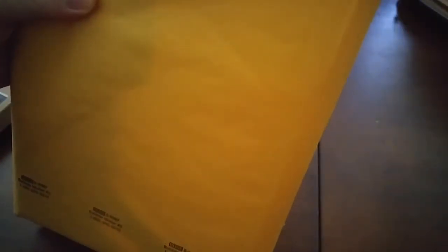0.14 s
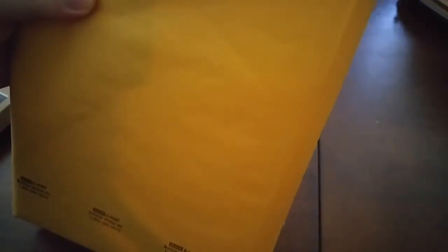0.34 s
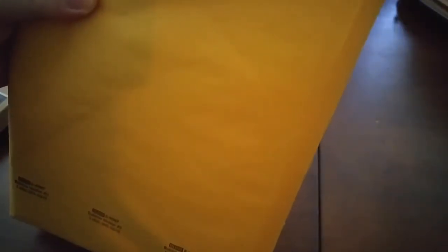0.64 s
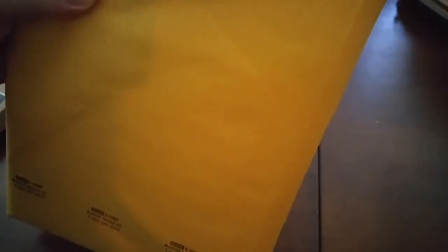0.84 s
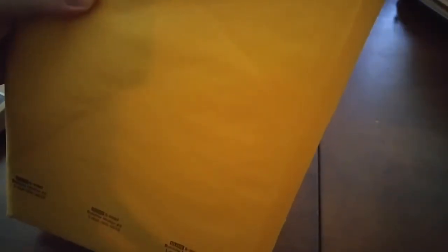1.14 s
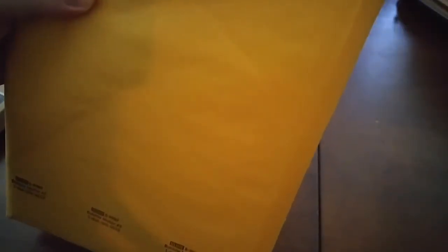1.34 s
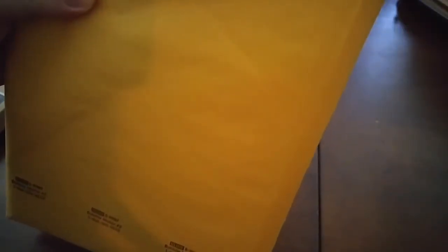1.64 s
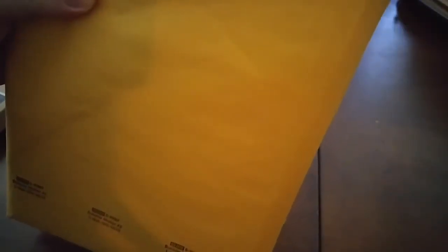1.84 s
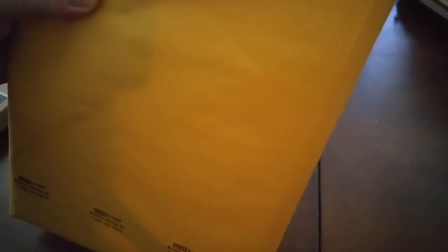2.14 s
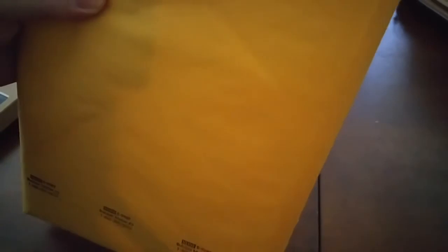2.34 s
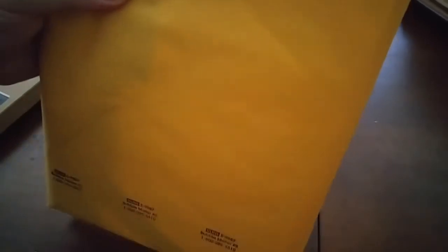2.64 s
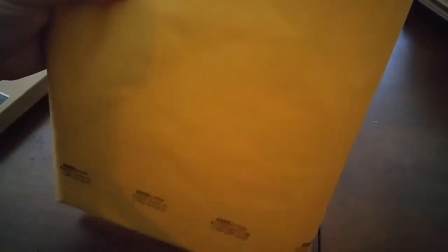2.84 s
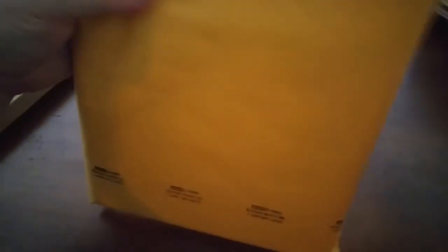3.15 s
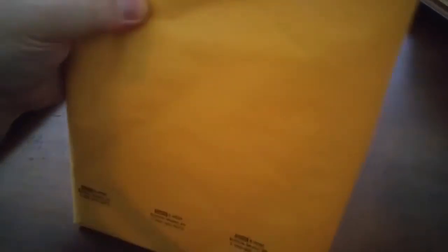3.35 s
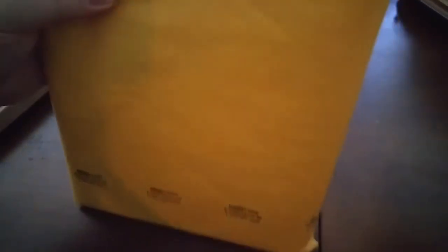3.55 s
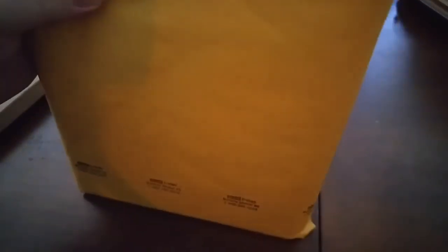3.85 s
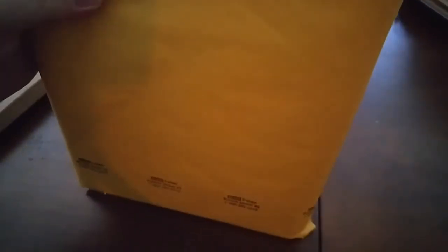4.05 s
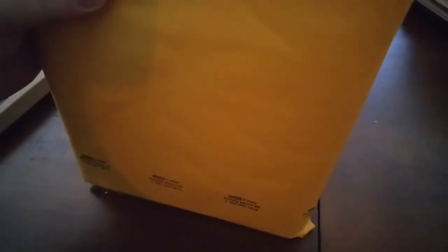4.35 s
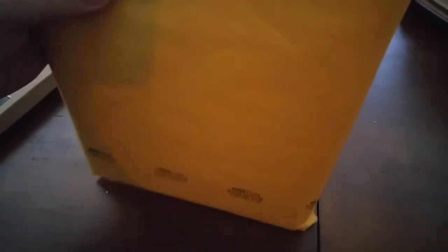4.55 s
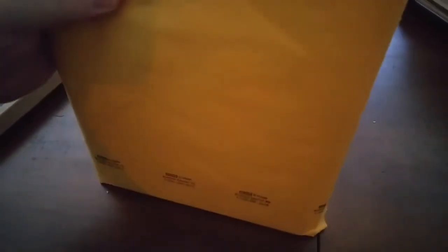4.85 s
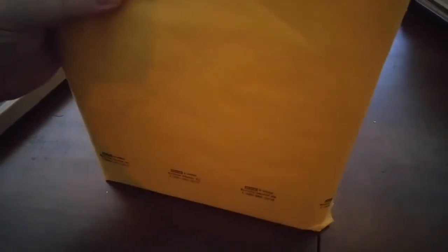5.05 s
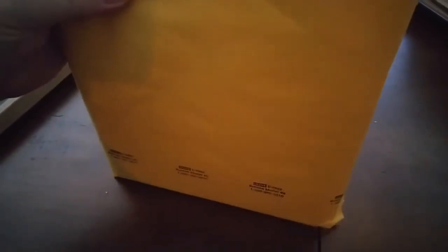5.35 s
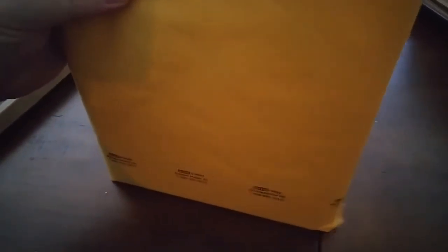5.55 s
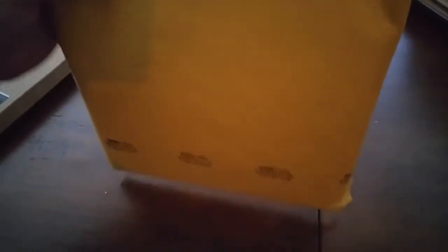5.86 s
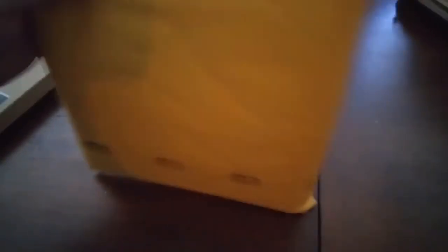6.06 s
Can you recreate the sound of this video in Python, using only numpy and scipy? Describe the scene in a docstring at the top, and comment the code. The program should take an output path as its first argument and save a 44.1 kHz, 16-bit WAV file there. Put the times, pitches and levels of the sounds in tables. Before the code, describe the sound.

A padded paper mailer is handled very close to the microphone in a quiet room with low room tone and a barely audible thin whine. From 0 to 1.8 s it is mostly still: light crease clicks at the start and around 0.4 s, faint rubbing, a very soft fibrous scrape near 0.6 s. Brighter ticks come at about 1.9 s, then rustling grows into a crackling cluster at 2.5 s. At 3.2 s a loud, dense snap lands with a dull low table thump, followed by vigorous rustle until 3.8 s. It quiets around 4 s with small clicks and a faint scrape after 4.2 s. Papery rubbing resumes, with hollow pops near 4.5 and 4.9 s, sharp snaps at 5.0 and 5.25 s with light knocks. The strongest cracks and a woody table knock arrive at 6.0 s, with coarse rustling to the cut at 6.2 s.

```python
"""Paper and fingers rub in a fine-grained rustle, then creases snap: a padded mailer is gripped, bent and slit.
The rustle is random grains shaped by filters, and each snap is a short noise burst with a damped low thud.
A blade drags as grains ringing in narrow bands; knocks ring the wooden table top, under a low press rumble.
A quiet room lies underneath, with noise, a faint whine and a tail after the snaps, close to a microphone."""
import sys
import numpy as np
from scipy import signal
from scipy.fft import rfft, irfft
from scipy.io import wavfile

SR = 44100
rng = np.random.default_rng(int(sys.argv[2]) if len(sys.argv) > 2 else 0)


def master_out(mix):
    """Clip the mix to full scale and print it as 16-bit PCM to the path in sys.argv[1]."""
    frames = np.transpose(np.atleast_2d(mix))
    ceiling = np.clip(frames, -1, 1)
    pcm = np.round(ceiling * 32767).astype(np.int16)
    wavfile.write(sys.argv[1], SR, pcm)


N = 273312


def amp(db):
    """dB to gain."""
    return 10 ** (np.asarray(db) / 20)


def rms_one(x):
    """Scale to an rms (average strength) of 1."""
    return x / np.sqrt(np.mean(x ** 2) + 1e-20)


def in_time(rows):
    """Join the rows of a table by straight lines: each column becomes one value per sample."""
    seconds, *columns = np.transpose(rows)
    return [np.interp(np.arange(N) / SR, seconds, column) for column in columns]


def at_hz(points, hz):
    """Read a table between its points, on a log-frequency axis."""
    table_hz, values = np.array(points).T
    return np.interp(np.log(hz), np.log(table_hz), values)


def colour(x, spectrum):
    """Filter to a given spectrum without sounding early (minimum phase); white noise keeps its rms."""
    size = 8192
    hz = np.arange(size // 2 + 1) * SR / size + 1
    gain = rms_one(amp(at_hz(spectrum, hz)))
    # fold the log spectrum's transform so that the filter only looks back in time
    cepstrum = irfft(np.log(gain))
    cepstrum[1:size // 2] *= 2
    cepstrum[size // 2 + 1:] = 0
    impulse = irfft(np.exp(rfft(cepstrum)))
    return signal.fftconvolve(x, impulse)[:len(x)]


def resonate(x, hz, width_hz):
    """A resonance favours one pitch; its gain there is 1."""
    r = np.exp(-np.pi * width_hz / SR)
    top = np.array([1, 0, -1]) * (1 - r * r) / 2
    return signal.lfilter(top, [1, -2 * r * np.cos(2 * np.pi * hz / SR), r * r], x + 1e-18)


def glide(x, hz, width_hz):
    """A resonance whose centre moves from block to block."""
    r, size = np.exp(-np.pi * width_hz / SR), 256
    state, out = np.zeros(2), np.zeros(N)
    for i in range(0, N, size):
        ring = [1, -2 * r * np.cos(2 * np.pi * hz[i] / SR), r * r]
        out[i:i + size], state = signal.lfilter([1, 0, -1], ring, x[i:i + size], zi=state)
    return out


def drift(rate_hz):
    """Smoothed noise wanders slowly by chance, with rms 1."""
    r = np.exp(-2 * np.pi * rate_hz / SR)
    white = rng.standard_normal(N + SR)
    return rms_one(signal.lfilter([1], [1, -2 * r, r * r], white)[SR:])   # drop the settling second


def grains(per_s, spread_db, clump_db):
    """Fibres let go at random, in clumps, with uneven sizes; rms 1."""
    sizes = amp(spread_db * np.minimum(rng.exponential(1, N), 5)) * rng.choice([-1, 1], N)
    let_go = rng.random(N) < per_s / SR
    return rms_one(sizes * let_go * amp(clump_db * drift(36)))


# Rustle that a snap shakes loose.
SHAKE_T60_S, SHAKE_RISE_S = 0.3, 0.0085   # time to die by 60 dB; smoothing of the onset


def shaken():
    """Strength of the rustle that each snap shakes loose: it swells briefly and dies away."""
    kicks = np.zeros(N)
    for s, crack_db, *_ in SNAPS:
        kicks[round(s * SR)] += amp(crack_db) ** 2   # energy, so the decay below is doubled
    dying = signal.lfilter([1], [1, -amp(-120 / (SHAKE_T60_S * SR))], kicks + 1e-18)
    r = np.exp(-1 / (SHAKE_RISE_S * SR))
    return np.sqrt(signal.lfilter([1 - r], [1, -r], dying))


# Fingers and paper rubbing, as curves that flicker when played.
# Each row: time in seconds, then base levels in dB of the paper body, the fine hiss and the top hiss.
RUBBING = [(0.0, -59, -52, -57), (0.04, -44.5, -72, -81), (0.17, -70, -64.5, -71), (0.39, -70, -68, -74),
           (0.5, -54, -66, -76), (0.57, -53, -54.5, -59), (0.72, -51, -55.5, -64), (0.85, -47.5, -56, -68),
           (0.93, -60.5, -65, -70), (1.07, -62.5, -59, -70), (1.14, -54, -58, -66), (1.22, -64.5, -59, -71),
           (1.37, -70, -60, -70), (1.45, -58.5, -63, -71), (1.6, -77, -68, -74), (1.79, -64, -64.5, -66),
           (1.9, -42, -52, -72), (2.01, -66, -65, -81), (2.06, -49, -58, -68), (2.14, -50, -54.5, -69),
           (2.21, -62, -61, -76), (2.29, -47, -54.5, -61), (2.4, -42, -47, -59), (2.46, -47, -49, -60),
           (2.56, -41, -43, -53), (2.72, -52.5, -54, -68), (2.78, -39.5, -55.5, -66),
           (2.87, -49, -45.5, -54), (2.97, -51, -52.5, -63), (3.08, -52, -52, -66), (3.13, -44, -50.5, -56),
           (3.27, -39, -32.5, -36.5), (3.36, -39.5, -49.5, -82), (3.49, -33, -36.5, -48),
           (3.64, -45, -47.5, -64), (3.72, -36, -43.5, -65), (3.8, -52, -59, -74), (3.94, -67, -66, -72),
           (4.06, -69, -67, -73.5), (4.17, -53.5, -61, -72.5), (4.21, -56.5, -59.5, -82),
           (4.34, -48, -58.5, -77), (4.39, -43.5, -51.5, -65), (4.49, -40.5, -53.5, -63),
           (4.62, -41.5, -48, -62), (4.71, -44, -50, -64), (4.88, -39.5, -44, -58), (4.92, -47.5, -54, -70),
           (5.1, -45, -59, -63), (5.19, -46.5, -49.5, -64), (5.23, -47, -62, -77), (5.3, -39, -42.5, -60),
           (5.46, -49.5, -50.5, -65), (5.51, -42, -44.5, -66), (5.54, -51, -57.5, -71),
           (5.63, -37, -40, -57), (5.69, -45.5, -46.5, -60), (5.78, -45, -45, -55), (5.82, -62, -49.5, -61),
           (5.87, -44, -42.5, -54), (5.96, -54.5, -48.5, -59), (6.03, -25, -34, -56),
           (6.16, -35.5, -48.5, -76), (6.198, -31, -34, -43)]
# How slack the paper hangs.
# Each row: time in seconds, slack-paper sound relative to the body in dB, middle of the body resonance in Hz.
SLACKNESS_CURVE = [(0.0, 1.5, 1450), (0.5, -3, 1490), (0.8, -2.5, 1550), (1.4, 0, 1500), (1.9, -3.5, 1800),
                   (2.3, -6, 1600), (2.6, -4, 1650), (2.8, -6, 1570), (3.05, -8, 2200), (3.2, -10, 1700),
                   (3.32, -1, 1660), (3.5, -19.5, 1690), (3.75, -15.5, 1560), (4.0, -1.5, 1540),
                   (4.25, -8.5, 1910), (4.4, -8.5, 1720), (4.55, -6.5, 1660), (4.95, -4, 1720),
                   (5.15, 2, 1520), (5.3, -2, 1710), (5.5, -8.5, 1810), (5.9, -14, 1870), (6.1, 5, 1320)]
# Tone of the paper body, the slack paper, the fine hiss and the top edge.
# Each row: frequency in Hz, relative level in dB per Hz.
PAPER_SPECTRUM = [(700, -17.5), (1000, 1.5), (1320, 1), (1550, -0.5), (1850, -2), (2070, -2.5), (2300, 0.5),
                  (2600, -6), (2900, -10.5), (4000, -17.5), (8000, -42), (16000, -55)]
SLACK_SPECTRUM = [(300, -18), (600, -1.5), (800, 4), (1100, 12), (1400, -15), (2500, -43.5)]
HISS_SPECTRUM = [(1500, -1.5), (2800, 3.5), (3300, 4), (3900, 1), (5200, 1), (6500, 0), (7800, -6.5),
                 (9000, -6.5), (12000, -16.5)]
TOP_SPECTRUM = [(5000, -12.5), (8500, -23.5), (10000, 4), (12500, -7), (14000, -14.5), (16000, -2.5)]
RUB_FLICKER_DB, RUB_FLICKER_HZ = 0.72, 17   # the grip never holds still
BODY_WANDER_HZ = 80.0   # rms wander of the body resonance
HOLLOW_HZ, HOLLOW_WIDTH_HZ = 312.4, 172   # the air inside the mailer booms
HOLLOW_RUB_DB = -6.5   # boom before the slackness is added
# shaken rustle relative to the snap's strength, before any slackness is added
SHAKE_DB, SHAKE_SLACK_DB, SHAKE_HISS_DB = -25.5, -22.5, -35.5


def rustle():
    """Coarse grains sound the paper body, whose resonance shifts as it bends; fine grains give the hiss."""
    body_db, hiss_db, top_db = in_time(RUBBING) + RUB_FLICKER_DB * drift(RUB_FLICKER_HZ)
    slack_db, body_hz = in_time(SLACKNESS_CURVE)
    body_hz = body_hz + BODY_WANDER_HZ * drift(2.0)
    shake = shaken()
    coarse = grains(4000., spread_db=2.0, clump_db=2.12)
    fine = grains(12000., spread_db=3.5, clump_db=0.46) + 0.078 * coarse

    body = colour(coarse, PAPER_SPECTRUM)
    body = rms_one(body + 0.48 * rms_one(glide(body, body_hz, 450.0)))
    boom = resonate(resonate(coarse, HOLLOW_HZ, HOLLOW_WIDTH_HZ), HOLLOW_HZ, HOLLOW_WIDTH_HZ)
    body = body + amp(HOLLOW_RUB_DB + slack_db) * rms_one(boom)

    # rubbing and shaking are unrelated, so their energies add
    body_level = np.hypot(amp(body_db), amp(SHAKE_DB - 0.27 * slack_db) * shake)
    slack_level = np.hypot(amp(body_db + slack_db), amp(SHAKE_SLACK_DB + slack_db) * shake)
    hiss_level = np.hypot(amp(hiss_db), amp(SHAKE_HISS_DB) * shake)
    return (body_level * body + slack_level * colour(coarse, SLACK_SPECTRUM)
            + hiss_level * colour(fine, HISS_SPECTRUM) + amp(top_db) * colour(fine, TOP_SPECTRUM))


# Tone of the pressing noise. Each row: frequency in Hz, relative level in dB per Hz.
RUMBLE_SPECTRUM = [(20, -65), (40, -18), (80, 6.5), (150, 6.5), (310, 5), (400, -11.5), (600, -49.5)]
RUMBLE_DB, RUMBLE_FOLLOWS = -59, 0.13   # base level at mean rubbing, before the lumps; share of rubbing's swing


def rumble():
    """The hands press the mailer unevenly on the table top: low lumpy noise that follows the rubbing."""
    lumps = amp(3 * drift(12))
    body_db = in_time(RUBBING)[0]
    level = amp(RUMBLE_DB + RUMBLE_FOLLOWS * (body_db - body_db.mean()))
    return level * colour(rng.standard_normal(N) * lumps, RUMBLE_SPECTRUM)


# Tone of the quiet room. Each row: frequency in Hz, relative level in dB per Hz.
ROOM_SPECTRUM = [(18, -28), (30, -6), (43, 2), (90, 6.5), (245, -1.5), (364, -10), (499, -36), (632, -1.5),
                 (702, -13), (1130, -12), (2900, -25), (3870, -37.5), (4190, -30.5), (16000, -47)]
# Steady tones of the electrical whine. Each row: middle frequency in Hz, rms level in dB.
WHINE_TONES = [(3930, -75), (7865, -86)]
ROOM_TONE_DB = -59.5


def background():
    """Filtered noise makes the room tone; sine waves make a thin electrical whine that wavers a little."""
    turns = np.cumsum(1 + .002 * drift(20)) / SR
    whine = sum(amp(db) * np.sqrt(2) * np.sin(2 * np.pi * hz * turns) for hz, db in WHINE_TONES)
    tone = rms_one(colour(rng.standard_normal(N), ROOM_SPECTRUM))
    return amp(ROOM_TONE_DB) * tone + whine


# Creases that snap. Each row: start in seconds, crack peak in dB (before the boom), crack pitch in Hz,
# tick burst level in dB (before its filter), thud level in dB (before its fades), thud pitch in Hz,
# burst decay time in ms.
SNAPS = [(0.026, -31, 1340, -39, -43, 189, 3.2), (0.034, -29, 1370, -45, -29, 332, 4.3),
         (0.05, -30, 1420, -44.5, -34.5, 129, 7.2), (0.196, -40.5, 2200, -52, -36, 184, 8),
         (0.215, -41, 1350, -57, -39.5, 76.5, 10), (0.308, -48, 1520, -66, -62, 83, 6.3),
         (0.406, -36, 1290, -69, -39, 253, 7), (0.415, -29.5, 1430, -47, -29.5, 239, 16),
         (0.424, -26.5, 2050, -39.5, -60, 240, 9.6), (0.434, -31, 1280, -40.5, -38, 299, 7.3),
         (0.529, -34, 1420, -56, -36, 127, 8.9), (0.712, -37, 1320, -52, -54, 299, 3.7),
         (0.818, -42, 1600, -58, -36.5, 96, 4.1), (1.04, -47, 1480, -49.5, -51, 84, 4.5),
         (1.109, -42.5, 1440, -47, -37, 139, 2.5), (1.39, -42.5, 1300, -63, -58, 78, 5.8),
         (1.592, -48, 1400, -60, -62, 100, 5.9), (1.623, -55, 2570, -55, -57, 307, 2.3),
         (1.66, -71, 1390, -72, -36.5, 185, 5), (1.743, -58, 2200, -51, -63, 191, 2.9),
         (1.762, -58, 2200, -53, -45, 127, 3.1), (1.775, -62, 2120, -55, -52, 83, 1.7),
         (1.815, -51, 2220, -24, -26, 222, 2.6), (1.873, -30, 2230, -23.5, -20, 285, 1.95),
         (1.903, -35, 3000, -29.5, -22, 282, 2.7), (2.041, -38, 1370, -56, -40, 283, 5.4),
         (2.084, -33, 2940, -35, -34, 147, 2.4), (2.244, -38.5, 1370, -54, -61, 196, 1.3),
         (2.276, -38, 1690, -56, -34, 215, 10), (2.351, -42, 2250, -45, -22, 260, 1.8),
         (2.373, -23, 1670, -31.5, -45, 78, 2.4), (2.48, -24.5, 1460, -38, -29, 73, 8.1),
         (2.49, -25, 1510, -33, -35, 81, 14), (2.512, -12, 1970, -33, -13, 301, 5.2),
         (2.519, -28, 1510, -34, -22, 182, 15), (2.535, -18.5, 1480, -32, -42, 180, 13),
         (2.545, -20.5, 1520, -42, -16.5, 135, 14), (2.555, -23.5, 1410, -37, -24.5, 250, 13),
         (2.602, -23, 1630, -52, -35, 328, 6.1), (2.807, -24, 1360, -34, -31, 161, 5),
         (2.815, -21, 1700, -44, -62, 222, 3.1), (2.992, -48, 2130, -42, -33, 203, 4.1),
         (3.042, -56, 2430, -32.5, -60, 194, 1.5), (3.156, -17, 2220, -30, -27, 119, 6.3),
         (3.178, -18, 1500, -26, -36, 196, 7.1), (3.183, -10.5, 1440, -27, -12, 278, 23),
         (3.198, -6.5, 1640, -24, -5.5, 133, 0.99), (3.203, -10, 1780, -18.5, -2.5, 199, 3.4),
         (3.206, -1.5, 2270, -11.5, -5.5, 201, 4.5), (3.814, -31.5, 1630, -53, -51, 285, 1.8),
         (3.866, -40.5, 1520, -62, -39, 283, 3.9), (3.959, -35, 1440, -54, -54, 86, 2.5),
         (3.992, -53, 1590, -52.5, -36, 190, 5.5), (4.153, -35.5, 1670, -48, -55, 183, 7.2),
         (4.168, -34, 1490, -42.5, -36, 272, 5.2), (4.183, -36.5, 960, -53, -33, 292, 4.3),
         (4.217, -40, 1200, -60, -22, 135, 4.1), (4.371, -37, 1350, -56, -65, 250, 9),
         (4.511, -21, 1090, -49, -28, 89, 6.5), (4.749, -30, 935, -52, -53, 326, 3.6),
         (4.806, -27, 1564, -34, -44, 73, 4.5), (4.862, -19.5, 920, -48, -16, 114, 2.9),
         (4.885, -23, 1270, -34.5, -38, 108, 2.4), (5.018, -5.5, 1890, -25, -0.5, 364, 2.3),
         (5.029, -7.5, 1660, -33, -8, 91, 5.2), (5.046, -5, 1640, -32, -10, 135, 5.4),
         (5.235, -25, 1530, -52, -33, 110, 3.1), (5.252, -12.5, 1440, -35, -10, 131, 2.2),
         (5.265, -21, 1740, -44, -21, 73, 7.8), (5.271, -13.5, 1540, -33, -7.5, 113, 7.9),
         (5.616, -30, 1550, -42, -40, 75, 3.7), (5.71, -58, 2080, -35, -63, 267, 14.5),
         (5.78, -28, 1920, -35.5, -34, 175, 5.7), (5.821, -27.5, 1310, -49, -33, 114, 3.3),
         (5.975, 2.5, 1810, -9, -3.5, 93, 4.15), (6.031, 3.5, 1600, -41, 0.5, 126, 1.85),
         (6.052, -7.5, 1210, -36, -14, 70, 4.6), (6.065, -6.5, 1090, -38, 4.5, 138, 7.1)]
# Tone of the bright tick. Each row: frequency in Hz, relative level in dB per Hz.
TICK_SPECTRUM = [(600, -13.5), (1500, -8), (2300, 8), (3300, -1.5), (5000, -7.5), (6500, -2.5),
                 (7800, -5.5), (9000, -29), (12000, -27.5)]
TICK_HZ, TICK_SPREAD_OCT = 4160, 0.046   # middle pitch of the tick; its scatter in octaves
SNAP_TOP_DB, HOLLOW_SNAP_DB = -12.5, -11.5   # top edge against tick, before losses; boom against crack
TOP_LOSS_PER_DB, TOP_SLACK_LOSS = 0.36, 0.72   # more thud over tick, or slacker paper, dulls the edge


def snaps():
    """A crease buckles in a short burst: a pitched crack, a bright tick and a dead thud."""
    body, bright, top = np.zeros((3, N + 4000))
    t = np.arange(4000) / SR
    slack_db = in_time(SLACKNESS_CURVE)[0]
    noise = rng.standard_normal((len(SNAPS), 4001))
    for (s, crack_db, hz, tick_db, thud_db, thud_hz, ms), (scatter, *white) in zip(SNAPS, noise):
        start = round(s * SR)
        at = slice(start, start + 4000)
        phase = t / (max(ms, .5) / 1000)
        burst = white * np.minimum(phase / 0.22, 1) * np.exp(-phase ** 1.13)

        crack = resonate(resonate(burst, hz, 400.0), hz, 560.0)
        crack = crack + 0.31 * colour(burst, PAPER_SPECTRUM) + 0.21 * colour(burst, SLACK_SPECTRUM)
        # the padded sheet flexes once and is damped within about a cycle
        thud = np.sin(2 * np.pi * thud_hz * t) * np.exp(-1.3 * thud_hz * t) * np.minimum(t / 0.0026, 1)
        boom = resonate(burst, HOLLOW_HZ, HOLLOW_WIDTH_HZ)
        body[at] += amp(crack_db) * crack / np.abs(crack).max() + amp(thud_db) * thud
        body[at] += amp(crack_db + HOLLOW_SNAP_DB) * boom / np.abs(boom).max()

        tick_hz = TICK_HZ * 2 ** (TICK_SPREAD_OCT * scatter)
        bright[at] += amp(tick_db) * (burst + 1.62 * resonate(burst, tick_hz, 1130.0))
        loss_db = TOP_LOSS_PER_DB * max(thud_db - tick_db, 0) + TOP_SLACK_LOSS * slack_db[start]
        top[at] += amp(tick_db + SNAP_TOP_DB - loss_db) * burst
    return body[:N] + colour(bright[:N], TICK_SPECTRUM) + colour(top[:N], TOP_SPECTRUM)


# How fast the room dies away. Each row: frequency in Hz, time to fall by 60 dB in seconds.
ROOM_DECAY_TIMES = [(100, 0.24), (1000, 0.39), (4000, 0.33), (12000, 0.17)]
ROOM_BASS_CUT_HZ = 290


def room(x):
    """Many echoes blur into a tail: octave bands of noise, each dying at its own rate."""
    t, tail = np.arange(SR // 2) / SR, 0
    white = rng.standard_normal(len(t))
    for low in 59.7 * 2 ** np.arange(8):
        band = signal.sosfilt(signal.butter(2, [low, 2 * low], "band", fs=SR, output="sos"), white)
        tail = tail + band * amp(-60 * t / at_hz(ROOM_DECAY_TIMES, low * np.sqrt(2)))
    tail = tail * np.clip((t - .003) / 0.0024, 0, 1)   # silent for 3 ms, then fades in
    x = signal.sosfilt(signal.butter(1, ROOM_BASS_CUT_HZ, "high", fs=SR, output="sos"), x)
    return signal.fftconvolve(x, tail / np.sqrt(np.sum(tail ** 2)))[:N]


# Strokes of the blade through paper.
# Each row: start in seconds, length in seconds, rise in seconds, level after the rise in dB.
BLADE_STROKES = [(0.54, .35, .03, -57), (4.23, .3, .16, -50)]
# Narrow bands that ring. Each row: frequency in Hz, width of each of two passes in Hz, relative gain in dB.
BLADE_BANDS = [(2400, 300, -3), (3400, 350, -5), (5250, 550, 0), (6150, 350, -3), (7500, 450, -9),
               (11300, 1000, -17), (12700, 1000, -18)]
BLADE_RISE_DB, BLADE_FADE_S = 16, 0.018   # swell of a stroke; short fade at both ends


def blade():
    """The edge tears fibres and rings in a few narrow bands; each stroke swells, holds and stops."""
    tearing = grains(5000.0, spread_db=5.0, clump_db=-0.5)
    ringing = rms_one(sum(amp(db) * resonate(resonate(tearing, hz, width), hz, width)
                          for hz, width, db in BLADE_BANDS))
    out, t = np.zeros(N), np.arange(N) / SR
    for s, length, rise, db in BLADE_STROKES:
        edge = np.clip(np.minimum(t - s, s + length - t) / BLADE_FADE_S, 0, 1)
        swell_db = db - BLADE_RISE_DB * np.clip(1 - (t - s) / rise, 0, 1)
        out += edge * amp(swell_db) * ringing
    return out


# The mailer's edge knocks on the table.
# Each row: start in seconds, strength of the push in dB, approximate contact time in ms.
TABLE_KNOCKS = [(2.513, -50, 2.6), (3.185, -23.5, 6.2), (3.205, -41, 6.4), (4.862, -49, 2.5),
                (5.017, -35, 1.1), (5.045, -58, 0.89), (5.252, -39, 1.3), (5.974, -25, 1.7),
                (6.031, -10, 0.87)]
# Ways the table top can ring.
# Each row: frequency in Hz, relative level in dB, time to fall by 60 dB in seconds.
TABLE_MODES = [(48, -7, .6), (64, 0, .65), (116, 1, .4), (160, -8, .15), (194, -2, .45), (250, -8, .2),
               (314, -7, .35), (435, -12, .2)]


def table():
    """Each knock pushes the table top, which rings in its low modes; a longer contact favours the lowest."""
    push, out = np.zeros((2, N))
    for s, db, ms in TABLE_KNOCKS:
        contact = np.hanning(round(ms * SR / 1000) + 3)
        start = round(s * SR)
        push[start:start + len(contact)] += amp(db) * contact / contact.sum()
    for hz, db, t60 in TABLE_MODES:
        r, w = amp(-60 / (t60 * SR)), 2 * np.pi * hz / SR
        out += signal.lfilter([0, amp(db) * np.sin(w)], [1, -2 * r * np.cos(w), r * r], push + 1e-18)
    return out


def scene():
    """Mailer, table and room add up at one microphone; only the snaps feed the room's tail."""
    cracks = snaps()
    mailer = cracks + rustle() + blade()
    return (mailer + table() + rumble() + amp(-11.5) * room(cracks) + background())[None]


NOTCH_HZ, NOTCH_WIDTH_HZ, NOTCH_DEPTH = 497, 120, .88   # depth: share taken away at the centre
CUTOFF_HZ = 15750


def record(dry):
    """The microphone housing cuts a notch and the deep bass, peaks are rounded, the top is cut."""
    notched = dry - NOTCH_DEPTH * resonate(dry, NOTCH_HZ, NOTCH_WIDTH_HZ)
    thinned = signal.sosfilt(signal.butter(4, 40., "high", fs=SR, output="sos"), notched)
    rounded = .92 * np.tanh(thinned / .92)
    return signal.sosfilt(signal.ellip(10, .3, 70, CUTOFF_HZ, fs=SR, output="sos"), rounded)


dry = scene()
out = record(dry)
master_out(out)
```